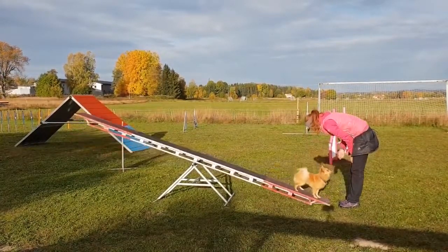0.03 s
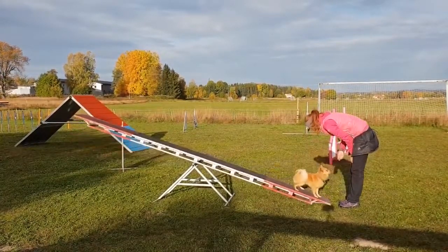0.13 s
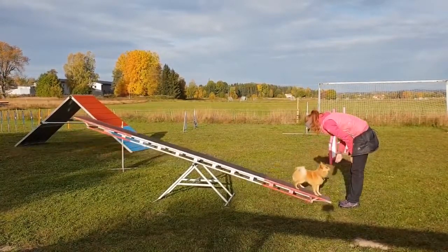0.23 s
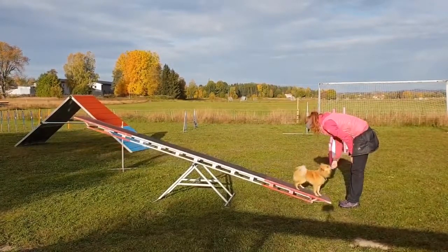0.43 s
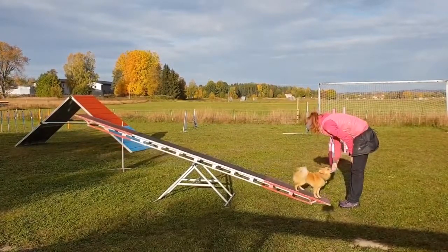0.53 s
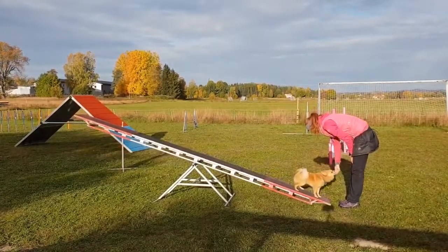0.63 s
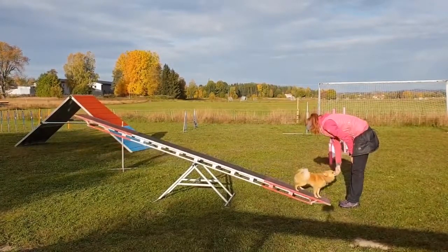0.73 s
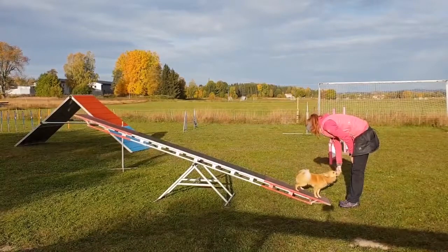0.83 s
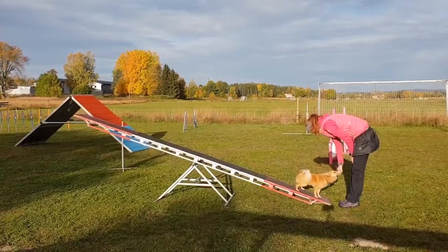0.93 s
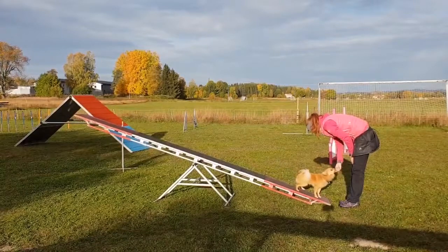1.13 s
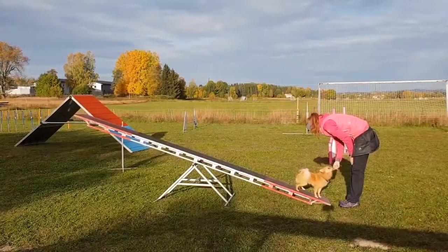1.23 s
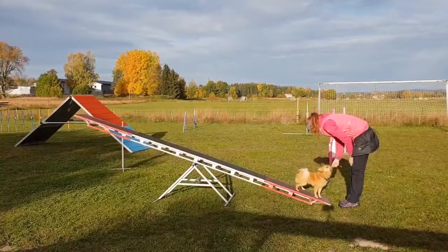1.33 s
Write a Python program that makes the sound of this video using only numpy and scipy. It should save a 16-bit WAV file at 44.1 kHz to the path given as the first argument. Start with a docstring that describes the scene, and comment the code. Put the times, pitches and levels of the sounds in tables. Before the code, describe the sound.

A seesaw plank lands on turf a few metres away at about 0.2 seconds and bounces once just before 0.3, making a quick double bang: a low wooden thud under the bright clatter of its metal frame and loose fittings. Brief ringing and a faint outdoor echo die away, then one small tick comes at 0.7 seconds. Very faint wind and distant rumble continue until about 1.4 seconds.

```python
"""On an open field, a dog tips an agility seesaw: the plank lands on the turf and bounces once.
The wooden-sounding thud is the plank's low tones; the struck metal frame clatters and rings,
and its loose fittings knock. A faint echo drifts back from the field's edge, then one small tick.
Underneath lie light wind, a distant rumble and hum, and two very faint calls of a far-off bird."""
import sys
import numpy as np
from scipy import signal
from scipy.fft import rfft, irfft
from scipy.io import wavfile
from scipy.ndimage import uniform_filter1d

SR = 44100
rng = np.random.default_rng(int(sys.argv[2]) if len(sys.argv) > 2 else 0)


def pcm_store(signal):
    """Save signal as 16-bit PCM."""
    levels = np.round(np.clip(np.atleast_2d(signal), -1, 1) * 32767)
    wavfile.write(sys.argv[1], SR, levels.astype(np.int16).T)


N = 61739
T = np.arange(N) / SR
HZ = np.fft.rfftfreq(N, 1 / SR)


def amp(db):
    """Turns decibels into a number to multiply by."""
    return 10 ** (np.asarray(db) / 20)


def evened(x):
    """Scales a signal to an average (rms) size of 1."""
    return x / np.sqrt(np.mean(x ** 2) + 1e-20)


def at_pitch(table, hz, column=1):
    """Looks up a table's column at any pitch, sliding between the rows."""
    columns = np.transpose(table)
    return np.interp(np.log(hz + 1), np.log(columns[0]), columns[column])


def loudness(table):
    """Turns rows of time_s, level_db into a volume curve."""
    return amp(np.interp(T, *np.transpose(table)))


def decay(start_s, rise_s, fade_s):
    """A quick rise, then a fall. Everywhere here, fade_s is the time to drop by 60 dB."""
    age = np.maximum(T - start_s, 0)
    return np.minimum(age / rise_s, 1) * amp(-60 * age / fade_s)


def noise(colour_db, likeness):
    """Stereo noise of size 1. Colour is each pitch's share; likeness 1 makes left and right the same."""
    left, other = rfft(rng.standard_normal((2, N)))
    likeness = np.clip(likeness, -1, 1)
    right = likeness * left + np.sqrt(1 - likeness ** 2) * other
    return evened(irfft(np.array([left, right]) * amp(colour_db), N))


def waver(rate_hz):
    """A smooth random wobble of size 1, mostly slower than rate_hz."""
    return noise(-40 * np.log10(1 + (HZ / rate_hz) ** 2), 0)[0]


def left_right(left_louder_db, left_lead_radians):
    """One factor for each side, making the left louder and earlier than the right."""
    side = amp(left_louder_db / 2) * np.exp(.5j * left_lead_radians)
    return np.array([side, 1 / side])


# Colour of the wind and rumble: pitch_hz, level_db
AIR_COLOUR = [(20, -11.5), (40, -4), (70, -6), (110, -6.5), (170, -12.5), (280, -20.5), (350, -13.5),
              (420, -13.5), (520, -13), (620, -16), (850, -12.5), (1300, -21.5), (1700, -27), (2200, -41),
              (3000, -44.5), (4300, -45), (6000, -49.5), (9000, -50.5), (13000, -48), (16000, -49)]
# How loud they are over time: time_s, level_db
AIR_LEVEL = [(0, -60.5), (.15, -63), (.45, -62), (.65, -61.5), (.9, -62.5), (1.15, -62.5), (1.4, -63.5)]
# How alike the two sides are: pitch_hz, likeness_0_to_1
AIR_LIKENESS = [(30, 0.74), (70, 0.37), (140, 1), (500, .85), (1500, 0.44), (4000, 0.12), (12000, .1)]
# Which side is louder: pitch_hz, left_louder_db
AIR_BALANCE = [(30, 2.5), (120, 2), (400, -1), (2000, -1.5), (12000, 0.5)]
BACKGROUND_LEAD_S = .00039  # the air and the drone reach the left side first

def air(patch_db=2):
    """Light wind and far-off rumble swell and sink in random patches, less so in the treble."""
    steady = noise(at_pitch(AIR_COLOUR, HZ), at_pitch(AIR_LIKENESS, HZ))
    hz, _, slices = signal.stft(steady, SR, nperseg=1024)
    patches = uniform_filter1d(rng.standard_normal(slices.shape[1:]), size=7, axis=0)
    patches = evened(uniform_filter1d(patches, size=7, axis=1))
    swell = amp(patch_db * patches / (1 + hz[:, None] / 3000))
    sides = left_right(at_pitch(AIR_BALANCE, hz), 2 * np.pi * hz * BACKGROUND_LEAD_S)
    drifting = signal.istft(slices * swell * sides[:, :, None], SR, nperseg=1024)[1][:, :N]
    return evened(drifting) * loudness(AIR_LEVEL)


# Narrow bands of noise above the hum: pitch_hz, width_hz, level_db (compared with the hum)
DRONE_BANDS = [(344, 27, -12.5), (511, 57, -8.5)]
# How loud the drone is over time: time_s, level_db
DRONE_LEVEL = [(0, -67.5), (.14, -59), (.45, -65), (.6, -60), (.8, -64), (1, -72), (1.4, -73)]

def drone(pitch_hz=70, wander=.055, swell_db=2, left_louder_db=3.5):
    """A distant wavering hum, off to the left, that fades away."""
    swell = amp(swell_db * waver(10))
    wandering_hz = pitch_hz * (1 + wander * waver(13))
    hum = swell * np.sqrt(2) * np.sin(2 * np.pi * np.cumsum(wandering_hz) / SR)
    bands = sum(amp(db) * noise(-20 * np.log10(1 + ((HZ - hz) / width * 2) ** 2), likeness=.87)
                for hz, width, db in DRONE_BANDS)
    sides = left_right(left_louder_db, 2 * np.pi * HZ * BACKGROUND_LEAD_S)
    return irfft(rfft(hum + bands) * sides, N) * loudness(DRONE_LEVEL)


# How loud the wind's thin rushing is: time_s, level_db
RUSH_LEVEL = [(0, -79.5), (.17, -83), (.7, -88.5), (.9, -96), (1.4, -88.5)]
# Puffs of wind: middle_s, half_length_s, level_db
PUFFS = [(.45, .03, -65), (.6, .03, -65), (.75, .04, -64), (1.15, .022, -62), (1.195, .012, -62)]
# Their deep colour: pitch_hz, level_db
PUFF_COLOUR = [(20, -9), (60, -7.5), (130, -1), (190, -8), (300, -19), (1000, -65), (16000, -93)]

def wind(rush_hz=1980, rush_width_hz=550):
    """Wind makes a thin rushing that sinks away and partly returns, and puffs on the microphones."""
    bell_curve_db = -10 * np.log10(np.e) * ((HZ - rush_hz) / rush_width_hz) ** 2
    rush = noise(bell_curve_db, likeness=.5) * loudness(RUSH_LEVEL)
    puffs = sum(amp(db) * np.exp(-((T - middle) / half_length) ** 2) for middle, half_length, db in PUFFS)
    return rush + puffs * noise(at_pitch(PUFF_COLOUR, HZ), likeness=.8)


# Thin bird calls: start_s, length_s, level_db
CHIRPS = [(0.04, 0.16, -91.5), (0.849, 0.1, -94.5)]

def bird(pitch_hz=4300, wander=.012):
    """A far-off bird whistles faintly on one wavering pitch."""
    level = sum(amp(db) * np.sin(np.pi * np.clip((T - start) / length, 0, 1))
                for start, length, db in CHIRPS)
    wandering_hz = pitch_hz * (1 + wander * waver(80))
    return level * np.sin(2 * np.pi * np.cumsum(wandering_hz) / SR)


# Blows on the frame: start_s, level_db, fade_s, brightness_db_per_octave, bounce_0_to_1
# (bounce 0 sounds like the landing, 1 like the bounce)
BLOWS = [(0.185, -52, 0.02, 0, 0.3), (0.1899, -42, 0.024, -5, 0.3), (0.2, -40.5, 0.052, -3.5, 0.1),
         (0.2038, -28.5, .06, .5, 0), (.2090, -27.5, 0.042, 1.5, 0), (.22, -38, 0.14, -3, .3),
         (0.2488, -37, 0.15, -1, 0.6), (0.2658, -29.5, .07, 2.5, 0.8), (0.2741, -38, 0.064, -2.5, 1)]
# Colour of the clatter: pitch_hz, landing_db, bounce_db
CLATTER_COLOUR = [(100, -16.5, -23.5), (295, -15.5, -9.5), (601, -11.5, -6), (1150, -13, -12.5),
                  (1700, -11, -9.5), (2430, -7, -2.5), (3146, -7, -9.5), (3540, -0.5, 3),
                  (3780, 0.5, -11.5), (4850, -2.5, -1), (5400, -16, -16), (5950, -7.5, -1),
                  (7640, -17, -15.5), (8900, -10, -11), (11000, -12.5, -18), (11800, -26, -12),
                  (12990, -14.5, -15.5), (15865, -40.5, -23)]
# How the seesaw reaches the two microphones: pitch_hz, likeness_0_to_1, left_louder_db, left_lead_radians
SEESAW_STEREO = [(122, 0.99, 3.5, 0.5), (1098, .85, -2.6, 0), (2200, 0.8, -1.5, 0.5),
                 (4000, .8, -3.5, 0.68), (5850, .85, -3, 1.47), (8000, 1, -1.3, 1.5),
                 (10900, 0.98, 10, 3.5), (12270, 0.29, -2, 3), (15000, 0.23, 0, 3)]
BLOW_RISE_S = .0014

def frame_clatter(shake_db=-15, shake_fade_s=.21):
    """Each blow on the metal frame sets off a dense clatter and a weaker, longer shaking."""
    out = np.zeros((2, N))
    octaves = np.log2(np.maximum(HZ, 500) / 4000)
    landing_db, bounce_db = at_pitch(CLATTER_COLOUR, HZ), at_pitch(CLATTER_COLOUR, HZ, column=2)
    for start, db, fade_s, brightness, bounce in BLOWS:
        colour = (1 - bounce) * landing_db + bounce * bounce_db + brightness * octaves
        shaking = amp(shake_db) * decay(start, BLOW_RISE_S, shake_fade_s)
        level = np.hypot(decay(start, BLOW_RISE_S, fade_s), shaking)
        out += amp(db) * level * noise(colour, at_pitch(SEESAW_STEREO, HZ))
    return out


# The frame's own tones: pitch_hz, level_db (added to each blow's), fade_s, extra_on_bounce_db
FRAME_TONES = [(1082, -36, .55, 0), (1356, -24, .15, 0), (1540, -25, .17, 2), (2121, -29, .25, 4),
               (3472, -18, .14, 9), (3610, -18, .1, 0), (4060, -18, .1, -3), (4655, -18, .1, -4),
               (5006, -26, .24, 6), (6067, -21, .27, -1), (6449, -28, .13, 3), (8904, -24, .27, -1),
               (10200, -29, .17, -3)]

def frame_ringing(flutter_db=2.2, flutter_hz=25):
    """The blows pile up energy in the frame's tones, which flutter as they die."""
    out = np.zeros(N)
    for hz, db, fade_s, extra_db in FRAME_TONES:
        energy = sum((amp(blow_db + extra_db * bounce) * decay(start, BLOW_RISE_S, fade_s)) ** 2
                     for start, blow_db, _, _, bounce in BLOWS)
        level = amp(db + flutter_db * waver(flutter_hz)) * np.sqrt(energy)
        out += level * np.sin(2 * np.pi * (hz * T + rng.random()))
    return out


# Thuds of the plank: start_s, level_db
THUDS = [(0.1917, -47), (0.2065, -37.5), (.219, -48.5), (.2745, -51), (0.286, -47)]
# The plank's own tones: pitch_hz, level_db (added to each thud's), fade_s
PLANK_TONES = [(122, -9.5, 0.23), (158.6, 1.5, 0.15), (228, -4.5, .13), (388.2, -11, .15), (506.4, -6, .12),
               (627, -10, .1), (777.4, -12, .18)]

def plank_thuds(rise_s=.003):
    """Meeting the turf shakes the plank, which sounds its low, short tones."""
    return sum(amp(thud_db + db) * decay(start, rise_s, fade_s) * np.sin(2 * np.pi * hz * (T - start))
               for start, thud_db in THUDS for hz, db, fade_s in PLANK_TONES)


# Sharp knocks of the fittings: start_s, level_db, pitch_hz
KNOCKS = [(.2054, -25, 4300), (.2116, -24, 4000), (.2364, -23, 3700), (.2499, -28, 3000)]

def loose_fittings(rise_s=.0001, fade_s=.005):
    """Loose parts knock, each with a high tone so short that it is heard as a click."""
    return sum(amp(db) * decay(start, rise_s, fade_s) * np.sin(2 * np.pi * hz * (T - start))
               for start, db, hz in KNOCKS)


# The echo from the field's edge: pitch_hz, level_db (compared with the seesaw), fade_s
ECHO = [(204.7, -26.5, 0.45), (1000, -22.5, .7), (2500, -27, 0.57), (4200, -30, 0.78), (6370, -30.5, 0.63),
        (9000, -30, .4), (15000, -37.5, .3)]

def field_echo(sound, delay_s=.03, build_s=.13):
    """The field's edge scatters back a thin echo that builds slowly; its highest treble dies first."""
    hz, time_s, slices = signal.stft(rng.standard_normal((2, N)), SR, nperseg=256)
    age = np.maximum(time_s - delay_s, 0)
    fade_s = at_pitch(ECHO, hz, column=2)[:, None]
    shape = np.minimum(age / build_s, 1) * amp(-60 * age / fade_s)
    shape *= amp(at_pitch(ECHO, hz))[:, None] / np.sqrt(N * np.mean(shape ** 2, axis=1, keepdims=True))
    echo_of_a_click = signal.istft(slices * shape, SR, nperseg=256)[1]
    return signal.fftconvolve(sound, echo_of_a_click, axes=1)[:, :N]


# Colour of the tick: pitch_hz, level_db
TICK_COLOUR = [(500, -1), (1500, -4), (2400, 3), (3200, -4.5), (3900, 3), (4400, -5), (5000, -5),
               (5800, -20), (10000, -28), (16000, -40)]

def tick(start_s=.7278, level_db=-69):
    """One faint, dry tick after the plank has settled."""
    level = amp(level_db) * decay(start_s, rise_s=.00094, fade_s=.16)
    return level * noise(at_pitch(TICK_COLOUR, HZ), likeness=.57)


def scene():
    """The seesaw a few metres from the microphones, its echo and the background."""
    sides = left_right(at_pitch(SEESAW_STEREO, HZ, column=2), at_pitch(SEESAW_STEREO, HZ, column=3))
    landing = frame_clatter() + frame_ringing() + plank_thuds() + loose_fittings()
    seesaw = irfft(rfft(landing) * sides, N)
    return seesaw + field_echo(seesaw) + tick() + air() + drone() + wind() + bird()


def record(dry):
    """Cuts away the very highest treble."""
    highest_hz = 15900
    treble_cut = signal.firwin(511, highest_hz, window=("kaiser", 9), fs=SR)
    return signal.oaconvolve(dry, treble_cut[None], "same")


dry = scene()
out = record(dry)
pcm_store(out)
```